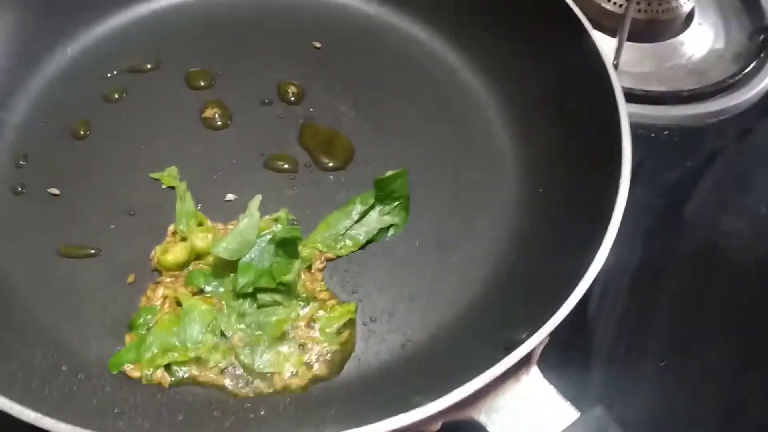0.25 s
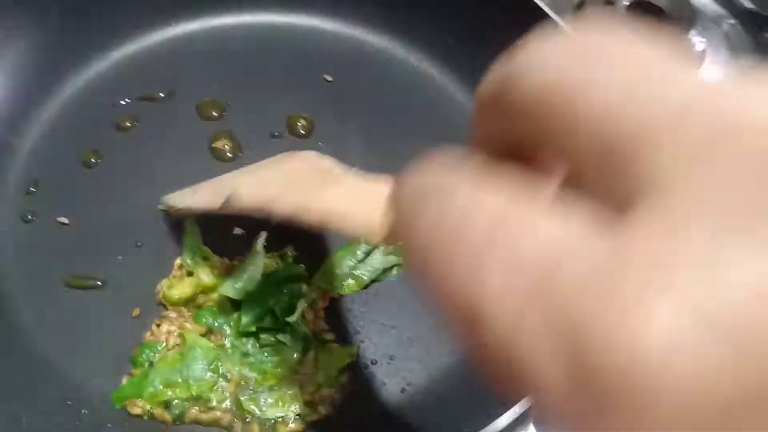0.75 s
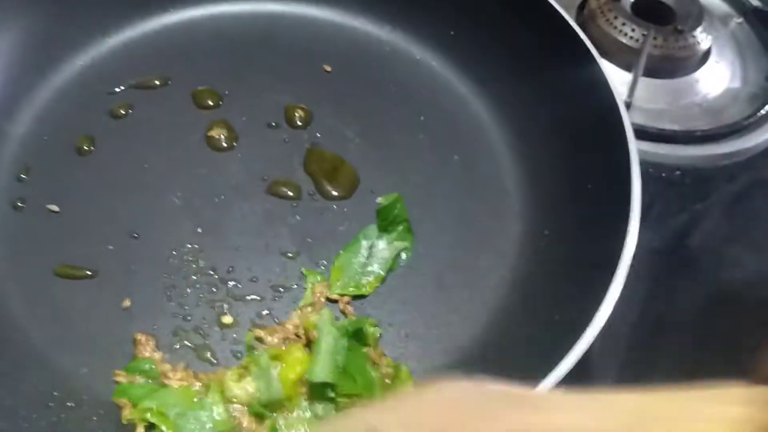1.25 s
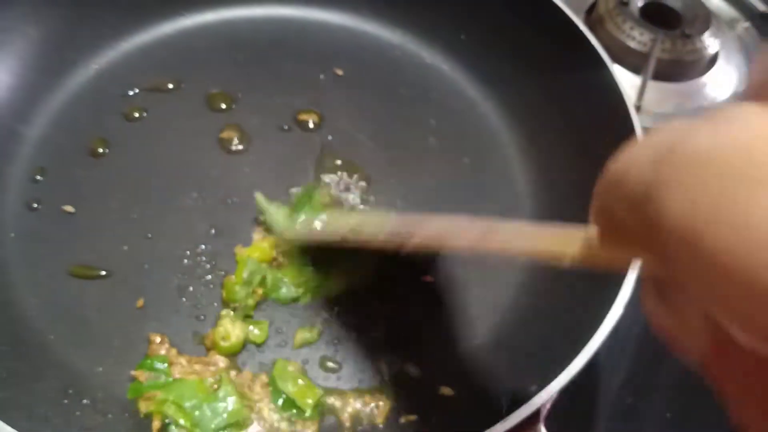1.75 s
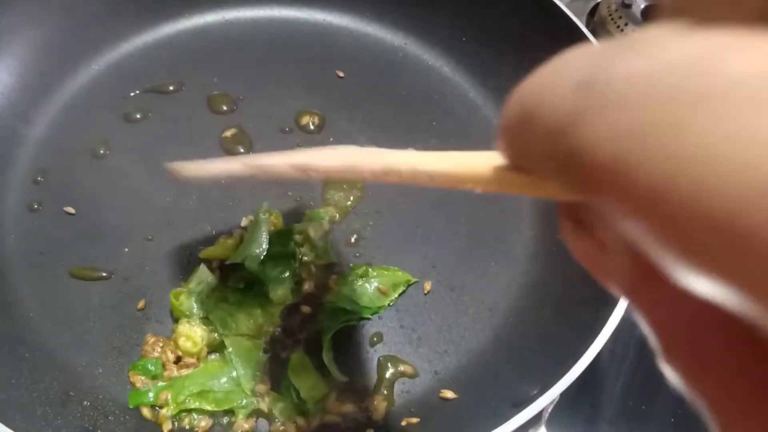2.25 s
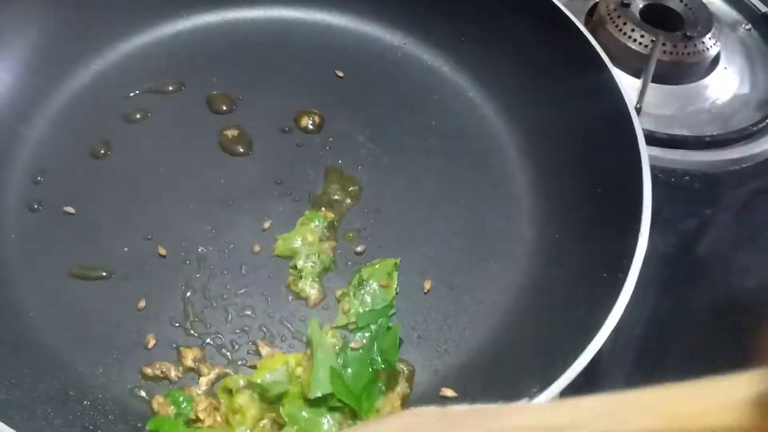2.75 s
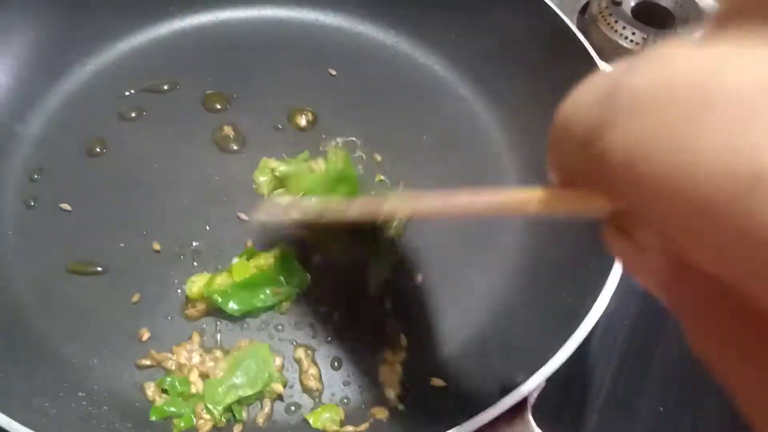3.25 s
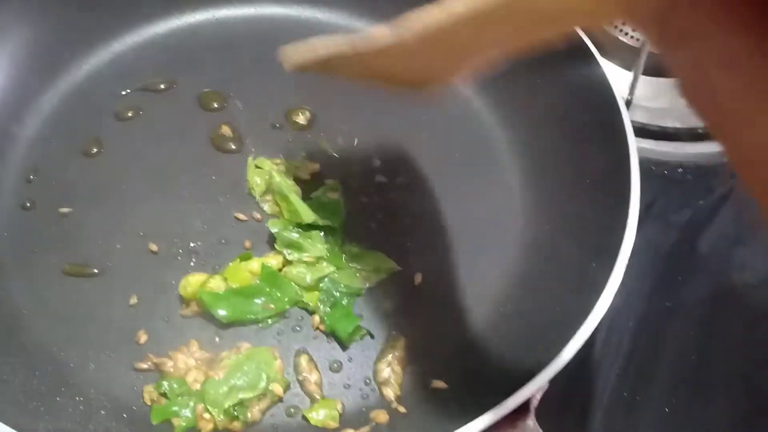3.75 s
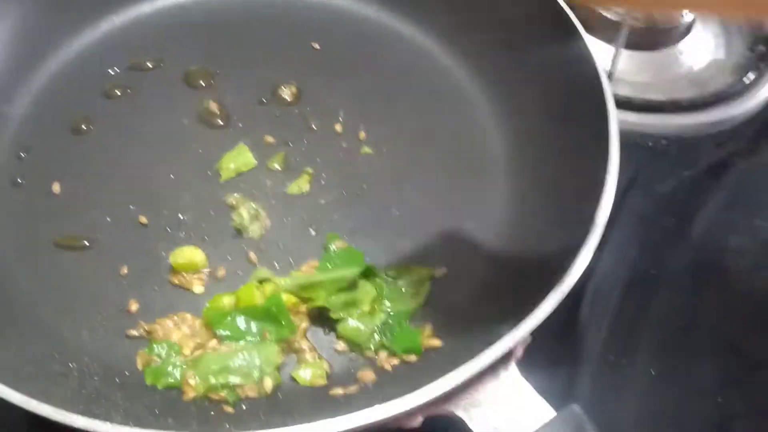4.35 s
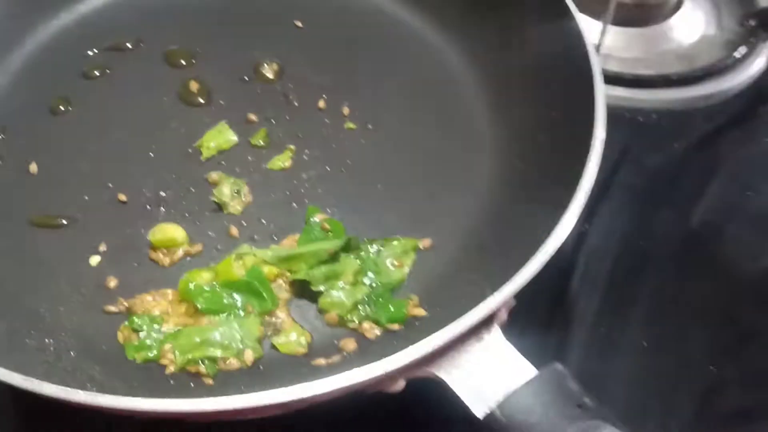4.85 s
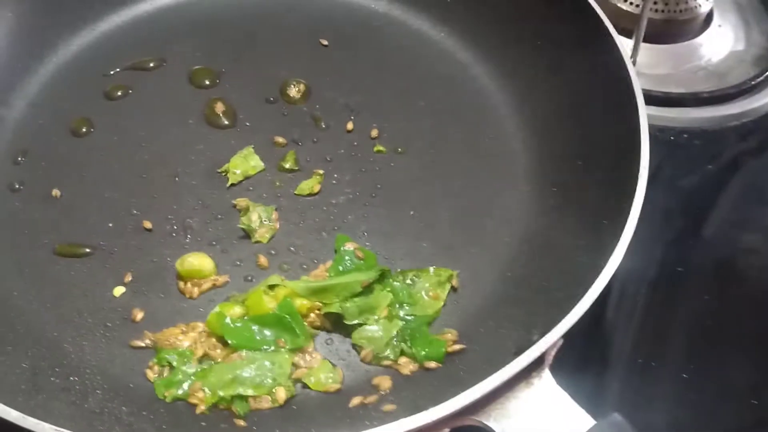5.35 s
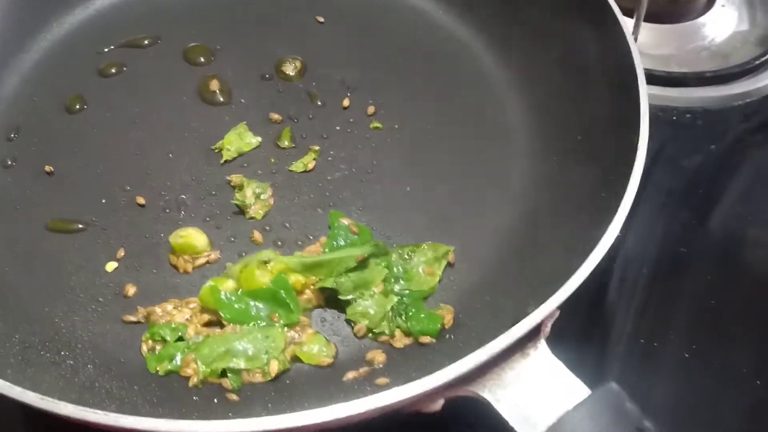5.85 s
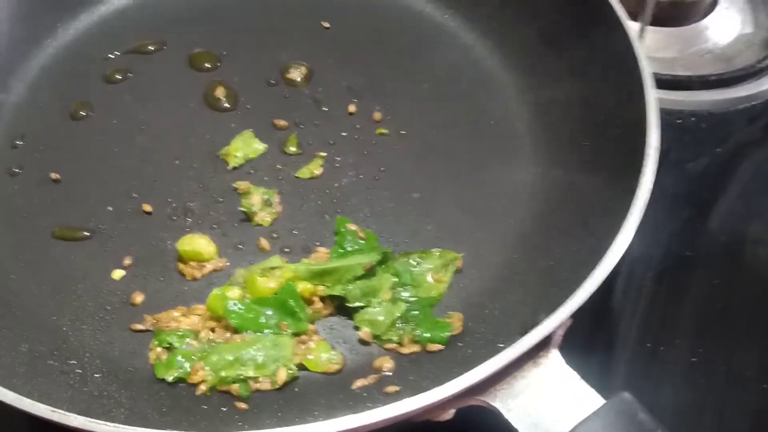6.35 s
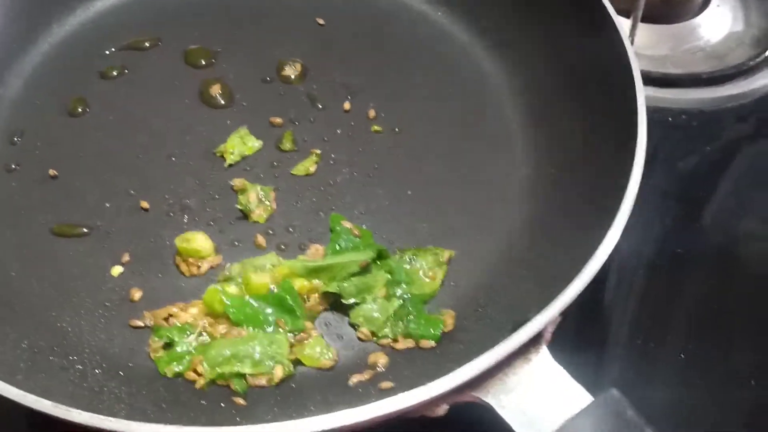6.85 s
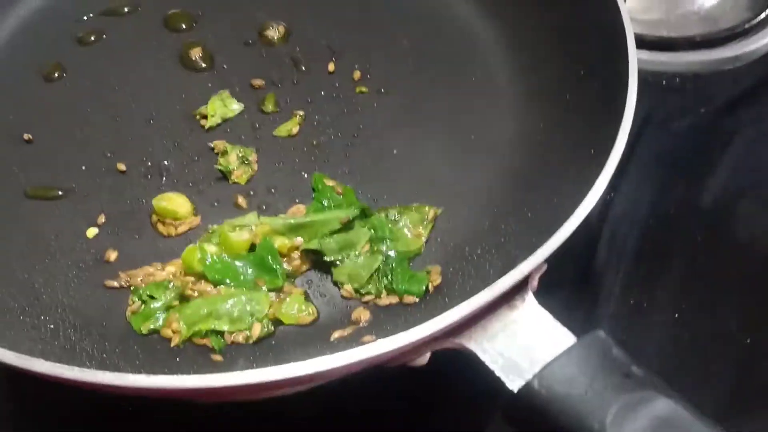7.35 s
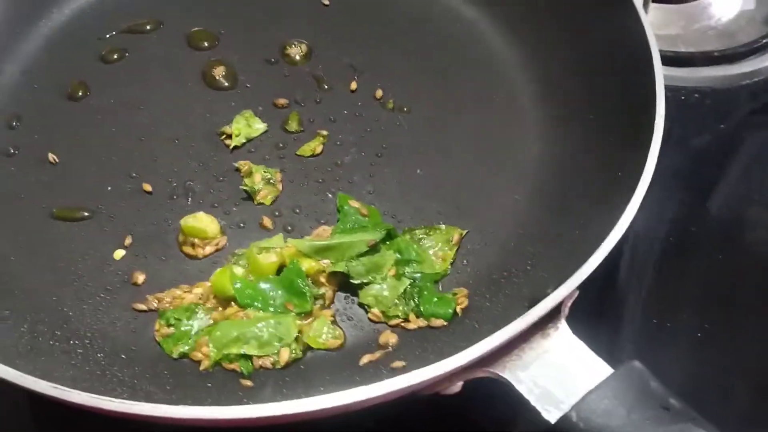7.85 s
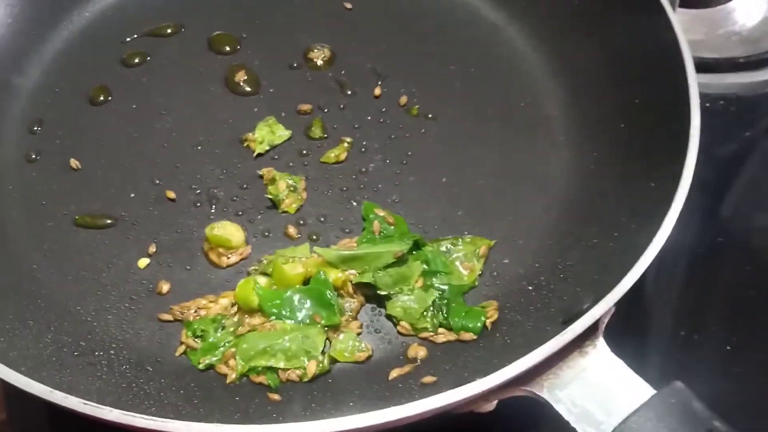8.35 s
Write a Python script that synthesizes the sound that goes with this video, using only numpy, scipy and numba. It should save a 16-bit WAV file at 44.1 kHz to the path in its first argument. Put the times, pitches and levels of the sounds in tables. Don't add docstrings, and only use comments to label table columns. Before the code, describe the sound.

Leaves and seeds fry in hot oil very close up, a dense bright sizzle with sharp pops, soft wooden spatula knocks and dull thumps.

```python
import sys
import numpy as np
from scipy import signal
from scipy.fft import rfft, irfft
from scipy.io import wavfile
from scipy.ndimage import uniform_filter1d
from numba import njit

SR = 44100
rng = np.random.default_rng(int(sys.argv[2]) if len(sys.argv) > 2 else 0)


def invert_db(level):
    return 10 ** (np.asarray(level, dtype=float) / 20)


def inscribe(sig):
    pcm = np.round(np.clip(np.atleast_2d(sig).T, -1, 1) * 32767)
    wavfile.write(sys.argv[1], SR, pcm.astype(np.int16))


N = 379683

# start_s, peak_db, ring_hz, length_samples
LONE_POPS = [(0.0254, -9, 1970, 4.6), (0.0709, -5, 2830, 1.3), (0.3133, -2, 4100, 7.0),
             (0.368, -7, 4020, 1.5), (0.5564, -11, 2530, 4.7), (0.781, -8, 3430, 2.5),
             (0.9118, -7, 4150, 2.7), (1.4998, -7, 3930, 2.0), (1.5761, -9, 2910, 1.8),
             (1.676, -6, 3740, 3.8), (2.295, -1, 4510, 1.7), (2.6519, -9, 3660, 1.2),
             (3.4141, -1, 2850, 2.6), (3.5604, -4, 4460, 2.0), (3.7083, -5, 4910, 4.0),
             (3.7419, -4, 3940, 3.0), (4.5846, -9, 4310, 2.4), (4.8689, -9, 2600, 5.2),
             (6.1015, -8, 4150, 2.9), (6.2952, -6, 3870, 5.8), (6.4892, -6, 3060, 5.1),
             (6.5985, -6, 4510, 2.6), (6.7809, -6, 2550, 5.0), (6.8324, -1, 3230, 4.2),
             (6.9666, -5, 2910, 3.8), (7.2844, -9, 4960, 4.2), (7.61, -7, 4280, 2.2),
             (7.6193, 0, 3810, 5.2), (8.261, -7, 3970, 3.9), (8.41, -3, 2430, 6.0)]
# start_s, peak_db
SNAP_EVENTS = [(.3565, -9), (.5497, -10), (1.1046, -8), (1.2073, -9), (1.2395, -8), (1.2849, -8),
               (8.4934, -9), (1.7152, -7), (2.2899, -9), (3.1096, -9), (3.1861, -9), (3.7659, -8),
               (5.1552, -8), (5.2472, -9), (5.6234, -9), (5.176, -9), (5.9341, -7), (5.9433, -8),
               (5.8112, -8), (6.7639, -7), (6.9462, -8), (6.9853, -7), (7.0485, -8), (7.1439, -8),
               (8.2493, -8), (7.7799, -8), (7.8292, -8), (7.9685, -8), (8.0217, -8), (8.3835, -7)]
# frequency_hz, left_db, right_db
PORT_RESPONSE = [(302, -13.5, -18), (936, -6, -10), (1325, -11, -15), (1746, -1.5, -6.5), (2810, 3, -5),
                 (3200, -1.5, -10), (4210, -2, -6), (5700, 0.5, 0.5), (6080, -0.5, -5),
                 (7630, -15.5, -14.5), (10770, -18, -20), (11250, -12, -13.5), (12600, -11.5, -19),
                 (15000, 0.5, -7)]


def level(x, db):
    return x * invert_db(db) / np.sqrt(np.mean(x ** 2))


def colour(x, hz, db, modes=()):
    f = np.fft.rfftfreq(4096, 1 / SR)
    gain_db = np.interp(np.log(f + 1), np.log(hz), db)
    for centre_hz, width_hz, hump_db in modes:
        gain_db = gain_db + hump_db * np.exp(-.5 * ((f - centre_hz) / width_hz) ** 2)
    cepstrum = irfft(gain_db * np.log(10) / 20)
    cepstrum[1:2048] *= 1.15
    cepstrum[2049:] *= .85
    response = np.roll(irfft(np.exp(rfft(cepstrum))), 1024)
    return signal.oaconvolve(x, response)[1024:N + 1024]


def walk(rate_hz):
    hold = int(SR / rate_hz)
    steps = rng.standard_normal(2000)[np.arange(N) // hold]
    return 1.3 * uniform_filter1d(uniform_filter1d(steps, hold), hold)


def burner():
    # frequency_hz, density_db (dB per Hz)
    flame = [(25, -36), (50, -33), (90, 1.5), (160, -1), (350, -14), (550, -0.5), (1000, -12), (1500, -13)]
    hz, db = np.transpose(flame)
    hz, db = np.r_[hz, 4000], np.r_[db, -60]
    mid = colour(rng.standard_normal(N), hz, db) * invert_db(4.4 * walk(37))
    side = colour(rng.standard_normal(N), hz, db) * invert_db(4.4 * walk(37))
    left = mid + 0.2 * side
    right = invert_db(-2) * (mid - 0.16 * side)
    return level(np.array([left, right]), -57.5)


def spatula():
    # start_s, peak_db, ring_hz, t60_s
    taps = [(1.525, -32, 1170, 0.03), (1.635, -29, 630, 0.023), (1.673, -27, 1000, 0.022),
            (1.713, -25, 713, 0.025), (1.953, -35, 990, 0.04), (2.003, -32, 910, 0.017),
            (3.451, -28, 1050, 0.027), (3.485, -38, 964, 0.025), (3.558, -28, 606, 0.025),
            (3.911, -30.5, 764, 0.079), (4.206, -34, 960, 0.033)]
    out, t = np.zeros(N), np.arange(4000) / SR
    for s, db, hz, t60 in taps:
        i = int(s * SR)
        contact = 1 - np.exp(-t / 0.0004)
        out[i:i + len(t)] += invert_db(db - 60 * t / t60) * contact * np.sin(2 * np.pi * hz * t)
    return np.array([invert_db(2.5) * out, invert_db(-.5) * out])


def jumps(table):
    out, t = np.zeros(N), np.arange(600) / SR
    rise = 1 - np.exp(-t / .00005)
    mesh = .25 * np.exp(-t / .0003) * np.sin(2 * np.pi * 14500 * t)
    overshoot = 1.1 * np.exp(-t / .00012)
    for s, db, leak_ms in table:
        i = int(s * SR)
        leak = np.exp(-1000 * t / leak_ms)
        out[i:i + len(t)] += invert_db(db + 2.5) * rise * (leak + overshoot + mesh)
    return out


def grip():
    # start_s, peak_db, leak_ms
    push = [
        (1.3804, -14.5, 0.64),
        (1.8503, -4.5, 0.7),
        (1.9564, -15.5, 0.26),
        (2.1166, -4, 1.2),
        (3.7526, -15, 0.66),
        (4.0344, -4.5, 1.1),
        (4.0446, -8.5, 1.5),
        (4.052, -20, 1.1),
    ]
    # start_s, peak_db, leak_ms
    pull = [(0.2143, -16, 0.13), (0.414, -13.5, 0.11), (0.5073, -15, 0.094), (0.5252, -5.5, 0.075),
            (1.641, -16, 0.19), (1.8685, -7.5, 0.56), (2.3482, -7.5, 0.064), (2.3988, -11, 0.2),
            (2.473, -9, 0.66), (2.5473, -20, 0.24), (2.918, -14.5, 0.12), (3.1984, -13.5, 0.13),
            (3.776, -11.5, 0.16), (3.8139, -3, 0.98), (4.059, -16, 0.38), (5.5046, -12, 0.083),
            (6.1814, -16, 0.17), (6.3491, -8.5, 0.07), (6.3585, -21, 0.22), (6.4844, -14, 0.16),
            (7.203, -21, 0.39), (8.1187, -6.5, 0.08), (8.2303, -10.5, 0.049)]
    # start_s, peak_db, leak_ms
    pull_right = [
        (.9744, -10, 0.1),
        (1.858, -27, .6),
        (2.6517, -22.5, 0.32),
    ]
    left = jumps(push) - jumps(pull)
    tick = signal.sosfilt(signal.butter(1, 2500, "high", fs=SR, output="sos"), left)
    return np.array([left, invert_db(-41) * tick - jumps(pull_right)])


def room(x, t60, db):
    t = np.arange(int(t60 * SR)) / SR
    tail = rng.standard_normal((2, len(t))) * invert_db(-60 * t / t60) * np.clip(t / 0.0052, 0, 1)
    tail *= invert_db(db) / np.sqrt(np.sum(tail ** 2, axis=1, keepdims=True))
    return signal.oaconvolve(x, tail, axes=1)[:, :N]


@njit
def bursts(at, size, width, turn, late, echo):
    out, shape = np.zeros(N + 4096), np.empty(256)
    for k in range(len(at)):
        reach = min(int(3 * width[k]) + 2, 127)
        start = int(at[k]) - reach
        if start < 0:
            continue
        for i in range(2 * reach + 1):
            d = start + i - at[k]
            shape[i] = -size[k] * np.exp(-.5 * (d / width[k]) ** 2) * np.cos(turn[k] * d)
            out[start + i] += shape[i]
        for e in range(late.shape[1]):
            for i in range(2 * reach + 1):
                out[start + late[k, e] + i] += echo[k, e] * shape[i]
    return out[:N]


def at_both_ports(at, db, width, hz, pan_db, lag, echo_db):
    out = []
    for side in (1, -1):
        late_ms = .15 + 4.0 * rng.random((len(at), 6)) ** 1.5
        sign_and_size = 2 * rng.random((len(at), 6)) - 1
        echo = invert_db(echo_db - 1.37 * late_ms) * sign_and_size
        late = np.clip(late_ms * SR / 1000, 1, 3000).astype(int)
        size = invert_db(db + side * pan_db / 2)
        out.append(bursts(at + side * lag / 2, size, width, 2 * np.pi * hz / SR, late, echo))
    return np.array(out)


def swarm(lag, spits, low_hz, high_hz, cycles, spread_db, bunch_db, scatter):
    grains, largest_db = 45000, 21
    u = rng.random((3, grains))
    z = rng.standard_normal((2, grains))
    at = u[0] * (N - 1)
    moment = at.astype(int)
    hz = low_hz * (high_hz / low_hz) ** u[1]
    bunch = bunch_db * (spits + 0.43 * walk(30))
    db = np.minimum(-spread_db * np.log(u[2]), largest_db) + bunch[moment]
    width = cycles * SR / hz / 2
    paths = lag[moment] + scatter * z[1]
    swarm_sound = at_both_ports(at, db - 10 * np.log10(width), width, hz, 3.0 * z[0], paths, echo_db=-9)
    return level(swarm_sound, 0)


def small_pops(fry_db):
    u = rng.random((4, 230))
    share = np.cumsum(invert_db(fry_db))
    s = np.interp(u[0], share / share[-1], np.arange(N) / SR)
    db = -14.5 - 1.8 * np.log(u[1])
    snaps = len(SNAP_EVENTS)
    s[:snaps], db[:snaps] = np.transpose(SNAP_EVENTS)
    ring_hz = 2500 + (5200 - 2500) * u[2]
    length_samples = 1.2 + (4.0 - 1.2) * u[3]
    return np.array([s, db, ring_hz, length_samples]).T


def pops(lag, fry_db):
    s, db, hz, width = np.vstack([LONE_POPS, small_pops(fry_db)]).T
    at = s * SR - 3
    port_hz, left_db = np.transpose(PORT_RESPONSE)[:2]
    ring_db = db - 0.23 * np.interp(hz, port_hz, left_db) + 3.5 - 2 * np.log10(width)
    pan_db = 1.4 * rng.standard_normal(len(s))
    paths = lag[at.astype(int)]
    splutter_db = np.clip(-4 + .9 * db, -13, -8)[:, None]
    ring = at_both_ports(at, ring_db, width, hz, pan_db, paths, splutter_db)
    snap = at_both_ports(at, db + 5.5 - width / 2, 0 * s + 0.49, 0 * s, pan_db, paths, splutter_db)
    return ring + snap


def clusters(t):
    s = np.r_[np.transpose(LONE_POPS)[0], np.transpose(SNAP_EVENTS)[0]][:, None]
    return 2.2 * np.max(np.exp(-.5 * ((t - s) / .014) ** 2), axis=0)


def frying():
    # start_s, crackle_db
    heat = [
        [(0, -35.5), (.62, -37), (.95, -36), (.98, -31.5), (1.28, -31.5), (1.4, -33.5), (1.71, -31.5),
         (2.05, -35.5), (2.6, -34.5), (3.79, -30.5)],
        [(3.8, -36.5), (4.05, -32.5), (4.27, -37), (5.45, -35), (5.52, -33.5), (6.6, -31.5), (8.3, -34),
         (8.61, -37)],
    ]
    # start_s, lag_samples
    port_lag = [(0, 3.6), (4.5, 3.9), (5.5, 5.86), (8.61, 5.3)]
    # frequency_hz, width_hz, gain_db
    resonances = [(2582, 150, 2.5), (2990, 210, 0.5), (3140, 40, -1), (3980, 104, 3), (9790, 200, -6.5),
                  (13500, 190, 4.5)]
    t = np.arange(N) / SR
    heat_db = np.interp(t, *np.vstack(heat).T)
    fry_db = heat_db + .4 * walk(9.8) + np.interp(t, t[::64], clusters(t[::64]))
    fizz_db = -1.5 + 1.2 * walk(8.3)
    lag = np.interp(t, *np.transpose(port_lag))
    spits = .2 * walk(18) + walk(55)
    crackle = swarm(lag, spits, 3900, 11700, cycles=0.18, spread_db=6.5, bunch_db=1.1, scatter=2.5)
    bubbles = swarm(lag, spits, 1500, 8000, cycles=1.1, spread_db=3.6, bunch_db=1.7, scatter=2.5)
    fizz = swarm(lag, .6 * spits, 8260, 15100, cycles=1.26, spread_db=7.0, bunch_db=1.2, scatter=4.15)
    oil = invert_db(fry_db + 6.5) * (crackle + invert_db(-2.5) * bubbles + invert_db(fizz_db) * fizz)
    oil = oil + pops(lag, heat_db)
    oil = oil + room(oil, .2, db=-15)
    hz, left_db, right_db = np.transpose(PORT_RESPONSE)
    left = colour(oil[0], hz, left_db, resonances)
    right = colour(oil[1], hz, right_db, resonances)
    return np.array([left, right])


def scene():
    return burner() + spatula() + grip() + frying()


def low_pass(x):
    return signal.sosfilt(signal.butter(12, 16100, fs=SR, output="sos"), x)


def record(dry):
    x = signal.sosfilt(signal.butter(2, 85, "high", fs=SR, output="sos"), dry)
    x = np.tanh(.9 * x) / .9
    x = signal.sosfilt(signal.ellip(8, .3, 60, 15480, fs=SR, output="sos"), x)
    return low_pass(x)


dry = scene()
out = record(dry)
inscribe(out)
```